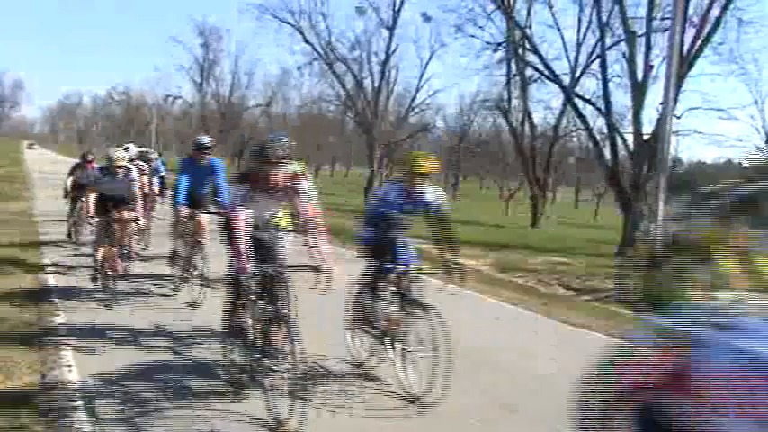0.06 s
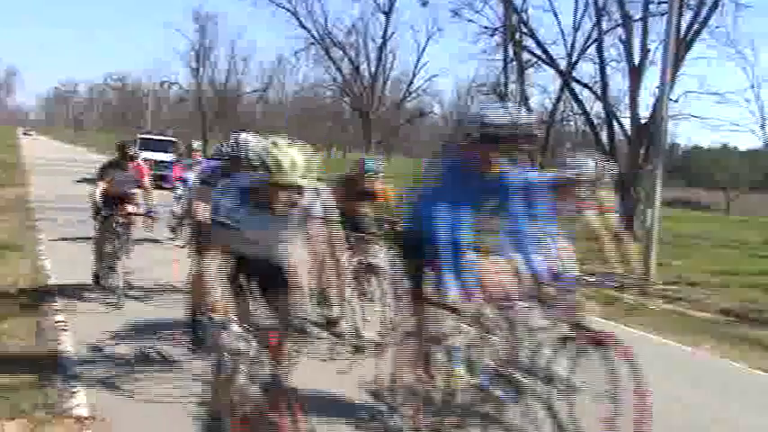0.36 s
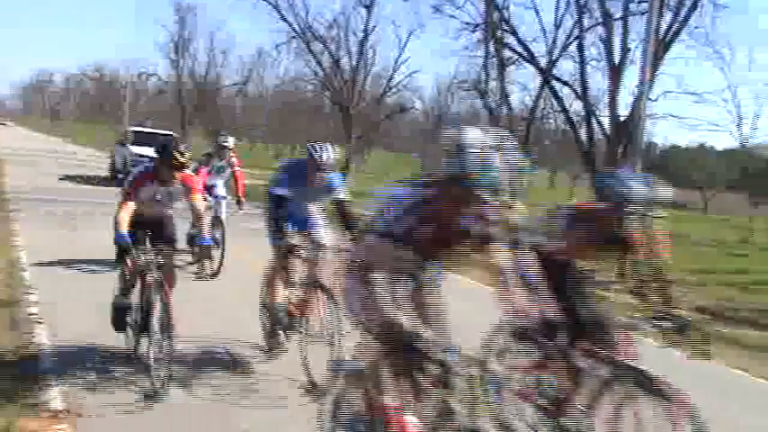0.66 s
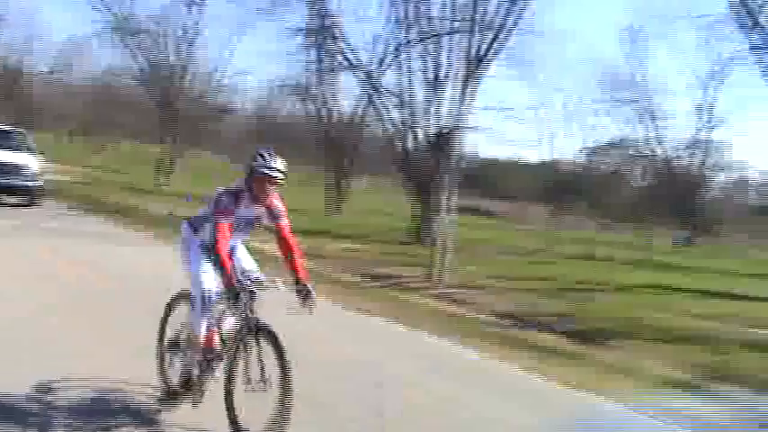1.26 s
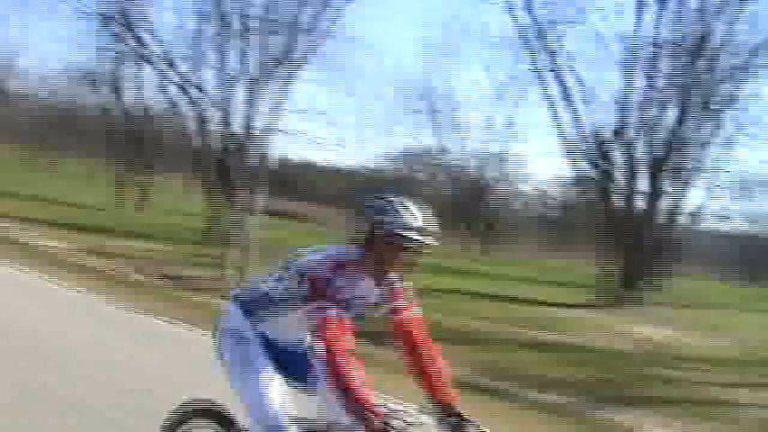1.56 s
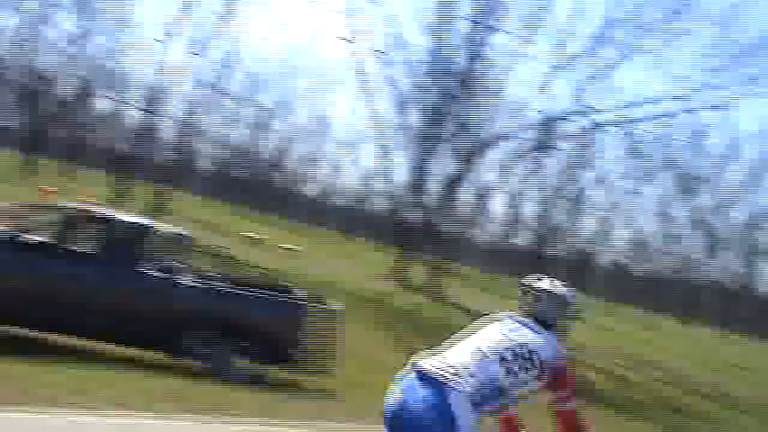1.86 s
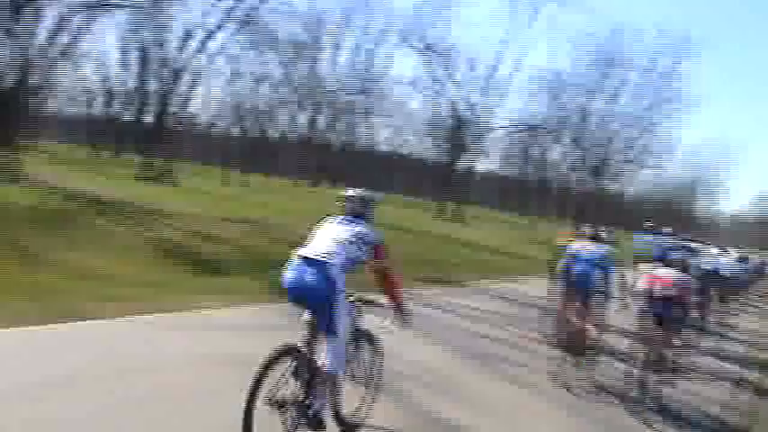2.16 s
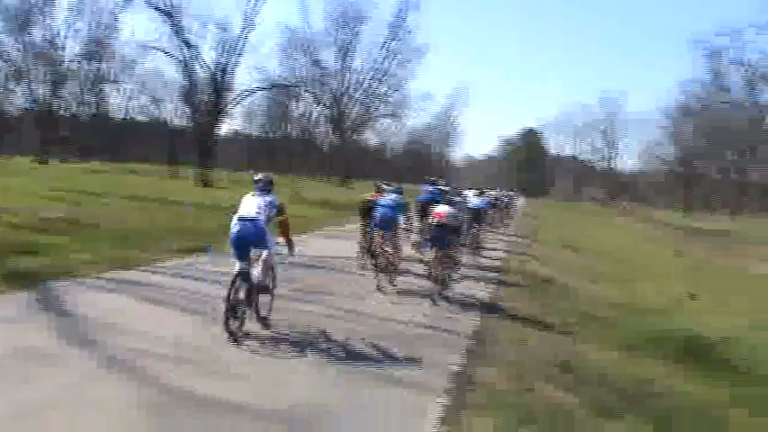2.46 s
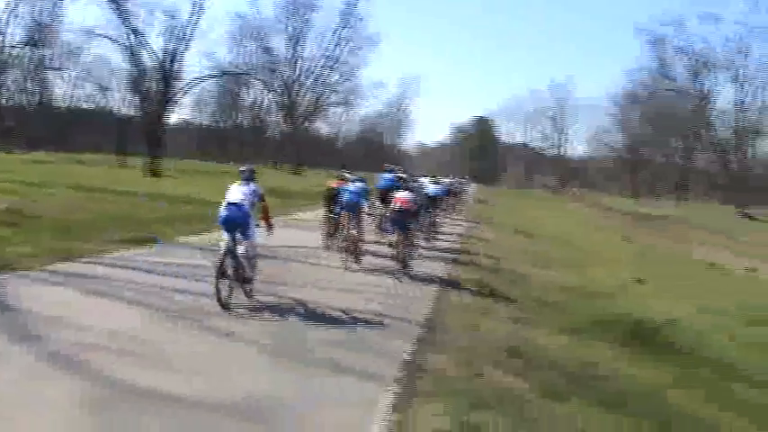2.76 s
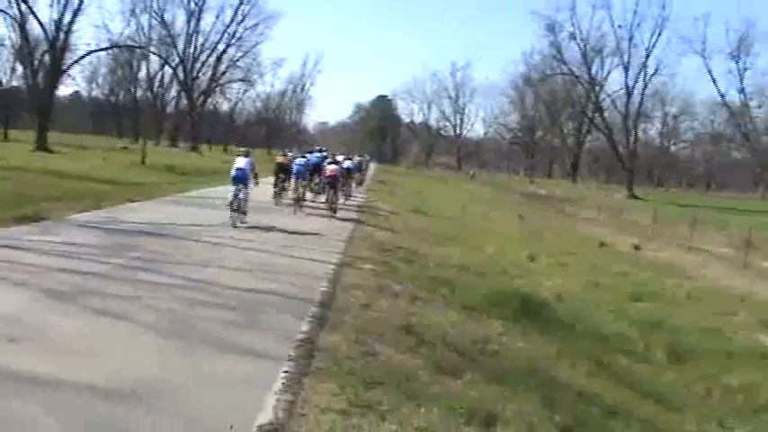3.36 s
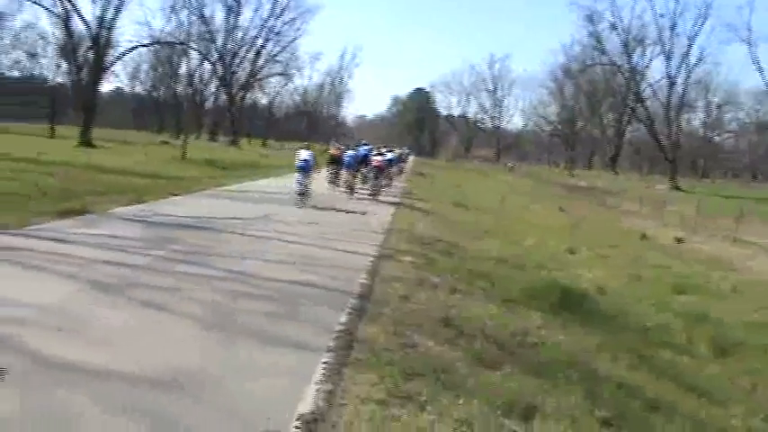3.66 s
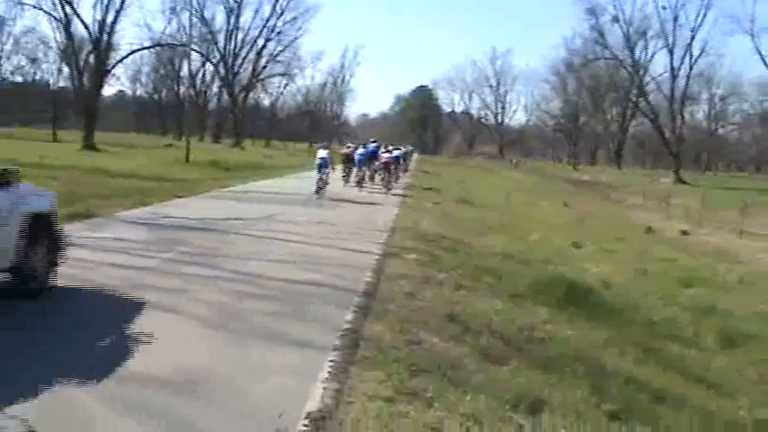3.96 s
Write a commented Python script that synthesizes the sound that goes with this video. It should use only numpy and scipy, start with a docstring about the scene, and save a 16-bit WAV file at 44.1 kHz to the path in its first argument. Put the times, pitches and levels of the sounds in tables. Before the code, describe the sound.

A pack of bicycles rushes past with hissing tyres and swishing wheels, while wind rumbles and thumps loudly on the microphone until about 1.8 seconds. A freewheel buzzes briefly at 1 second, and chains tick, snapping twice just before 2 seconds. Another gust hits around 2.6 seconds. The bicycles fade as a distant tyre roar swells near 3.5 seconds. A pickup's tyres hum faintly throughout.

```python
"""Gusts of wind rumble and thump as a pack of racing bicycles rushes past on a country road.
The breeze and the air dragged along by the riders buffet a microphone's two openings (ports).
Tyres rush, spokes and chains hiss, a freewheel buzzes briefly, and a chain ticks and snaps twice.
As the pack fades, a far roar of tyres swells, and the tread of a following pickup hums throughout."""
import sys
import numpy as np
from scipy import signal
from scipy.fft import rfft, irfft
from scipy.io import wavfile
from scipy.ndimage import uniform_filter1d

SR = 44100
rng = np.random.default_rng(int(sys.argv[2]) if len(sys.argv) > 2 else 0)


def bounce(signal):
    """Save signal as a 16-bit WAV file at the path given by the first command-line argument."""
    frames = np.transpose(np.atleast_2d(signal))
    limited = np.clip(frames, -1, 1)
    pcm = np.round(limited * 32767).astype(np.int16)
    wavfile.write(sys.argv[1], SR, pcm)


N = 176400  # 4 seconds

# How wind, then road sound, reaches the two ports: pitch_hz, likeness (0 to 1), left_lead_radians
PORTS_IN_WIND = [(30, 0.73, 0), (100, 0.87, 0), (161.5, 0.097, 0.72), (255, 0.38, -2), (443, 0.63, -2.5),
                 (670, 0.93, -2.5), (1540, 0.81, -3), (2740, 0.77, -2.5)]
PORTS_FROM_ROAD = [(60, 0.46, -1.8), (400, 0.72, -0.54), (930, 0.94, -1.06), (1400, 0.94, -0.91),
                   (2020, 1, -0.85), (2840, 0.9, -0.032)]
# How much louder the left side is than the right: time_s, wind_db, tyres_db
LEFT_BALANCE = [(0.0, 1, -10.5), (0.26, 0.5, -1), (1.55, 1, -9), (1.83, -1, 0), (1.88, 2, -5.5),
                (2.45, -1.5, -2), (3.4, -3.5, 5.5), (3.75, -2.5, 2), (4.0, 3, 0)]
TREBLE_HZ, TREBLE_LIKENESS = 4200, .9999  # above this pitch, left and right are nearly the same


def wind(t, gain_db=2.5, flutter_db=2.0, flutter_hz=55):
    """Wind buffets the ports; the air behind a close rider makes it brighter and sets it popping."""
    # Strength of the wind: time_s, level_db
    strength = [(0, -31.5), (.08, -21), (.13, -30), (.18, -17), (.38, -16), (.44, -19.5), (.56, -17.5),
                (.67, -25), (.8, -21), (1.04, -20), (1.12, -17.5), (1.22, -18), (1.45, -18), (1.63, -17.5),
                (1.71, -23.5), (1.82, -23), (1.86, -29.5), (1.98, -29), (2.18, -37), (2.27, -27.5),
                (2.38, -30.5), (2.52, -31), (2.56, -19), (2.68, -23), (2.78, -22.5), (2.87, -25.5),
                (3.05, -30), (3.1, -44.5), (3.31, -27), (3.45, -40), (3.6, -27.5), (3.67, -35), (4, -36)]
    # How much of the wind is gusts from the riders: time_s, share (0 to 1)
    rider_wake = [(0, 0.43), (.14, 0.2), (.22, 0.83), (.39, 0.76), (.48, 0.95), (.65, 0.32), (.87, 0.51),
                  (1.02, 0.7), (1.15, 0.81), (1.3, 0.7), (1.5, 0.82), (1.68, 0.57), (1.9, 0.2), (2.5, 0),
                  (2.63, 0.35), (2.9, 0.18), (4, 0.08)]
    # Tone of a strong gust and of the light breeze: pitch_hz, level_db
    gust_tone = [(20, -22), (50, -8.5), (80, -18), (140, 0), (290, -0.5), (480, -2.5), (850, -8),
                 (1500, -18), (3000, -30.5), (6000, -41), (12000, -83)]
    breeze_tone = [(20, -7), (45, -8.5), (70, 0), (140, 1), (260, -3.5), (370, -7), (520, -11.5),
                   (850, -24), (1500, -47), (3000, -64), (12000, -89)]
    level_db, = over_time(strength, t)
    gust_share, = over_time(rider_wake, t)
    left_db, _ = over_time(LEFT_BALANCE, t)
    gust = port_noise(gust_tone, PORTS_IN_WIND, pops_per_s=200, pop_share=0.31)
    breeze = port_noise(breeze_tone, PORTS_IN_WIND)
    air = np.sqrt(gust_share) * gust + np.sqrt(1 - gust_share) * breeze
    air *= amp(flutter_db * wander(flutter_hz))
    return pan(even_out(air) * amp(level_db + gain_db), left_db)


def thumps(t, width_s=0.011, gain_db=3):
    """Large single swirls of air strike the ports with deep thumps."""
    # Each swirl's hit: peak_s, level_db
    hits = [(.174, -20), (0.218, -18.5), (.615, -27), (.85, -19), (.93, -21), (1.125, -21), (1.16, -20),
            (1.268, -25), (1.615, -18), (1.785, -25), (1.814, -19), (1.908, -23.5), (2.095, -25.5),
            (2.285, -24.5), (2.437, -26), (2.573, -18.5), (2.62, -19), (2.707, -16.5), (3.305, -23),
            (3.611, -21)]
    # Tone of a swirl: pitch_hz, level_db
    swirl_tone = [(20, -7), (48, -1), (85, 1), (140, 2), (260, -3), (450, -8.5), (850, -20.5), (2000, -36),
                  (12000, -89)]
    force = sum(amp(db + gain_db) * np.exp(-((t - peak_s) / width_s) ** 2 / 2) for peak_s, db in hits)
    return even_out(port_noise(swirl_tone, PORTS_IN_WIND)) * force


def riders(t, tyre_gain_db=3, hiss_gain_db=1, rattle_gain_db=-11, rattles_per_s=120):
    """Tyres rush on coarse asphalt; spokes hiss and chain links rattle."""
    # Loudness of the passing pack: time_s, tyres_db, chains_and_spokes_db
    pack = [(0, -31.5, -40), (.1, -31.5, -44), (.5, -32.5, -45), (.75, -33, -40), (1.03, -31.5, -39.5),
            (1.3, -35, -43.5), (1.6, -35, -45), (1.8, -33.5, -45), (1.92, -34.5, -49.5), (2.1, -35.5, -47),
            (2.65, -37, -49.5), (3.4, -38.5, -49), (4, -41, -50)]
    # Tone of the tyres and of the hiss: pitch_hz, level_db
    tyre_tone = [(100, -12), (600, -7), (900, 1.5), (1400, 0), (1900, -1), (2170, -4), (2400, -3.5),
                 (2900, -8.5), (3400, -12), (5000, -21.5), (11000, -52.5)]
    hiss_tone = [(1000, -7.5), (3000, 4), (4300, 2.5), (6000, 0.5), (7500, -1.5), (8600, -3.5), (10000, -6),
                 (11500, -16)]
    tyres_db, metal_db = over_time(pack, t)
    _, left_db = over_time(LEFT_BALANCE, t)
    tyres = pan(port_noise(tyre_tone, PORTS_FROM_ROAD), left_db)
    grit_db = wander(rate_hz=70)
    tyres *= amp(tyres_db + tyre_gain_db + grit_db)
    link_hits = rng.random(N) < rattles_per_s / SR
    hit_db = 4 * np.minimum(rng.exponential(1, N), 3)  # many soft hits, a few hard ones
    rattle = amp(rattle_gain_db) * unit(steel_ring(link_hits * amp(hit_db)))
    hiss = amp(hiss_gain_db) * port_noise(hiss_tone, PORTS_FROM_ROAD)
    return tyres + amp(metal_db) * (hiss + rattle)


def wheel_swishes(t):
    """The nearest wheels sweep by, swelling and fading within moments."""
    # Each wheel going by: peak_s, level_db, half_length_s
    wheels = [(0.249, -32, 0.015), (0.312, -33, 0.0085), (0.43, -37, 0.017), (.75, -34, 0.014),
              (1.224, -40.5, 0.042), (1.502, -34.5, 0.017)]
    # Tone of a swish: pitch_hz, level_db
    swish_tone = [(600, -23), (1500, 4), (3000, 9.5), (4800, 5.5), (7000, -4), (11000, -48)]
    swells = sum(amp(db) / (1 + ((t - peak_s) / half_s) ** 2) for peak_s, db, half_s in wheels)
    return port_noise(swish_tone, PORTS_FROM_ROAD) * swells


def chain_clicks(t, rise_s=0.0018, tail_db=-17, tail_s=0.038, cog_db=-4):
    """The chain snaps against cog teeth: a short scrape, and each cog rings at its own pitch."""
    # Each snap of the chain: peak_s, level_db, fade_s, pitch_hz
    snaps = [(0.172, -37.5, .004, 8400), (0.312, -54, 0.0016, 6300), (.745, -38, 0.0099, 8360),
             (1.317, -36, 0.0037, 9400), (1.479, -37.5, 0.0055, 10300), (1.628, -36, 0.0033, 9200),
             (1.653, -33.5, 0.0029, 8760), (1.709, -36, .004, 8300), (1.767, -35, 0.0032, 8550),
             (1.782, -37, 0.0025, 8400), (1.81, -43, .003, 8500), (1.8458, -26, 0.004, 8160),
             (1.877, -40.5, 0.0027, 8200), (1.970, -26.5, 0.001, 8860)]
    scrape = unit(steel_ring(rng.standard_normal(N)))
    out = np.zeros(N)
    for peak_s, level_db, fade_s, pitch_hz in snaps:
        age = np.maximum(t - peak_s + rise_s, 0)
        rise = np.minimum(age / rise_s, 1)
        fade = np.exp(-np.maximum(t - peak_s, 0) / fade_s)
        tail = amp(tail_db) * np.exp(-age / tail_s)
        cog = unit(resonate(rng.standard_normal(N), pitch_hz, width_hz=300))
        out += amp(level_db) * rise * (fade + tail) * (scrape + amp(cog_db) * cog)
    return out


def steel_ring(drive):
    """Makes a sound ring like chain and cogs, keeping its strength."""
    # Pitches at which the steel rings: pitch_hz, width_hz, level_db
    rings = [(2200, 1400, -14), (4300, 1400, 10), (6300, 1900, 14), (8400, 1200, 7.5)]
    ringing = sum(amp(db) * resonate(drive, hz, width_hz) for hz, width_hz, db in rings)
    return unit(ringing) * np.std(drive)


def freewheel(t, pass_s=0.99, half_length_s=0.049, level_db=-38.5, taps_per_s=71):
    """Small catches tap a ringing wheel hub, whose pitch sinks as it coasts by (the Doppler effect)."""
    hub_hz, slide_hz_per_s, width_hz = 6600, -1400, 600
    age = t - pass_s
    tap_progress = age * taps_per_s % 1  # runs from 0 to 1 between taps
    taps = np.exp(-tap_progress / 0.25) * rng.standard_normal(N)
    pitch_hz = hub_hz + slide_hz_per_s * np.clip(age, -.2, .2)
    ring = resonate(taps, pitch_hz, width_hz)
    ring = resonate(ring, pitch_hz, width_hz)  # twice, for a purer pitch
    return unit(ring) * amp(level_db) / (1 + (age / half_length_s) ** 2)


def far_roar(t):
    """Tyres further down the road blend into a smooth roar."""
    # Loudness of the roar: time_s, level_db
    loudness = [(0, -33), (1.8, -50), (2.3, -39.5), (2.9, -34.5), (3.3, -28.5), (3.6, -28), (4, -32)]
    # Tone of the roar: pitch_hz, level_db
    roar_tone = [(30, -3.5), (120, 3.5), (300, -13.5), (500, -0.5), (680, -4.5), (860, -2.5), (1200, -9),
                 (1800, -20.5), (4000, -61), (11000, -66)]
    return port_noise(roar_tone, PORTS_FROM_ROAD) * amp(over_time(loudness, t)[0])


def pickup_tread(t):
    """The tread of the pickup's tyres sings on the road."""
    # Loudness of the tread: time_s, level_db
    loudness = [(0, -34), (1.2, -31), (1.9, -37), (2.3, -34.5), (2.8, -37), (3.5, -36), (4, -37.5)]
    # Tone of the tread: pitch_hz, level_db
    tread_tone = [(300, -56), (700, -2.5), (830, 4), (890, 2.5), (970, -3), (1270, -10), (1420, -13),
                  (2150, -9), (2400, -19), (3000, -40)]
    return port_noise(tread_tone, PORTS_FROM_ROAD) * amp(over_time(loudness, t)[0])


def port_noise(tone, ports, pops_per_s=0, pop_share=0):
    """Noise with a given tone, and pops if asked for, as the left and right ports receive it."""
    hz = np.fft.rfftfreq(N, 1 / SR)
    likeness, left_lead = over_hz(list(ports) + [(TREBLE_HZ, TREBLE_LIKENESS, 0)], hz)
    smooth, pop_sizes = rng.standard_normal((2, 2, N))
    pops = unit(np.tanh(pop_sizes) * (rng.random(N) < pops_per_s / SR))
    left, unrelated = rfft(np.sqrt(1 - pop_share) * smooth + np.sqrt(pop_share) * pops)
    right = (likeness * left + np.sqrt(1 - likeness ** 2) * unrelated) * np.exp(-1j * left_lead)
    return unit(irfft(np.array([left, right]) * amp(over_hz(tone, hz)[0]), N))


def even_out(air, steadiness=.85):
    """Takes most of the chance swells out of wind noise."""
    power = uniform_filter1d((air ** 2).mean(0), size=1500)
    return unit(air / power ** (steadiness / 2))


def pan(x, left_db):
    """Leans a stereo sound to one side; the treble stays in the middle."""
    hz = np.fft.rfftfreq(N, 1 / SR)
    low = irfft(rfft(x) * np.clip(1 - (hz / TREBLE_HZ) ** 2, 0, 1), N)
    return x + low * (amp(np.array([left_db, -left_db]) / 2) - 1)


def resonate(x, pitch_hz, width_hz):
    """Makes x ring at a steady or sliding pitch; a smaller width rings longer."""
    spin = np.exp(2j * np.pi * np.cumsum(pitch_hz * np.ones(len(x))) / SR)
    feedback = np.exp(-np.pi * width_hz / SR)
    return 2 * (spin * signal.lfilter([1 - feedback], [1, -feedback], x / spin + 1e-18)).real


def wander(rate_hz):
    """A random wobble of typical size 1, up to about rate_hz fast."""
    hz = np.fft.rfftfreq(N, 1 / SR)
    return unit(irfft(rfft(rng.standard_normal(N)) * np.exp(-(hz / rate_hz) ** 2), N))


def over_time(table, t):
    """Reads a table's columns at the times t, gliding between rows."""
    time_s, *columns = np.transpose(table)
    return [np.interp(t, time_s, column) for column in columns]


def over_hz(table, hz):
    """Reads a table's columns at the pitches hz, gliding between rows."""
    pitch_hz, *columns = np.transpose(table)
    return [np.interp(np.log(hz + 1), np.log(pitch_hz + 1), column) for column in columns]


def amp(db):
    """Turns decibels into a number to multiply by."""
    return 10 ** (np.asarray(db) / 20)


def unit(x):
    """Scales a sound to an average strength (rms) of 1."""
    return x / np.sqrt(np.mean(x ** 2) + 1e-20)


def scene():
    """Wind on the microphone over the passing bicycles and the road behind them."""
    t = np.arange(N) / SR
    return (wind(t) + riders(t) + wheel_swishes(t) + far_roar(t) + pickup_tread(t)
            + chain_clicks(t) + freewheel(t) + thumps(t))


def record(dry, ceiling=.95, cutoff_hz=11450):
    """Rounds off the strongest peaks, then cuts the highest treble."""
    rounded = dry / (1 + (dry / ceiling) ** 6) ** (1 / 6)
    treble_cut = signal.firwin(511, cutoff_hz, window=("kaiser", 9), fs=SR)
    return signal.oaconvolve(rounded, treble_cut[None], "same")


dry = scene()
out = record(dry)
bounce(out)
```